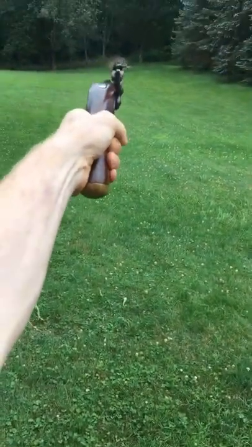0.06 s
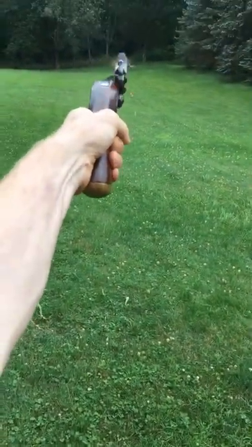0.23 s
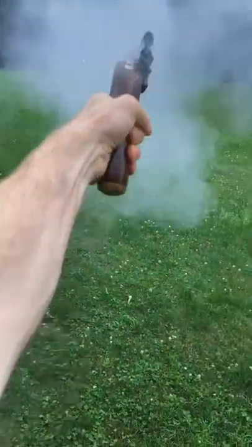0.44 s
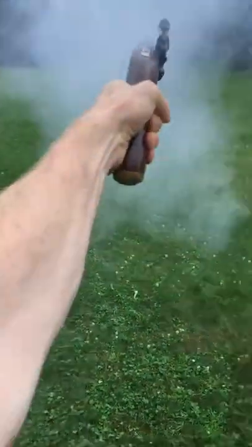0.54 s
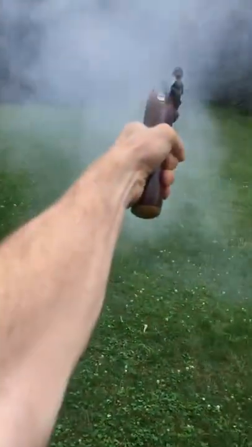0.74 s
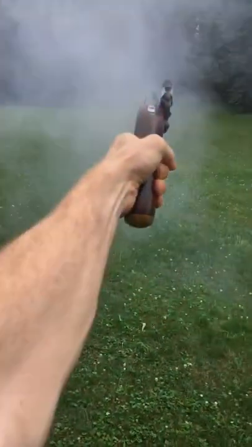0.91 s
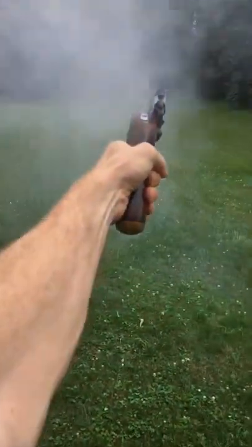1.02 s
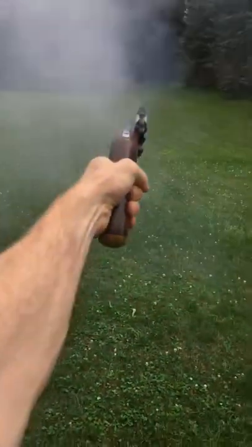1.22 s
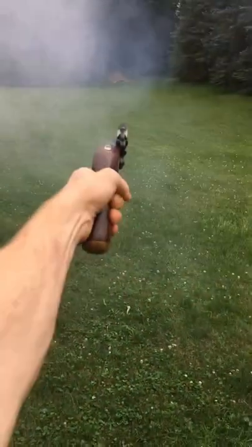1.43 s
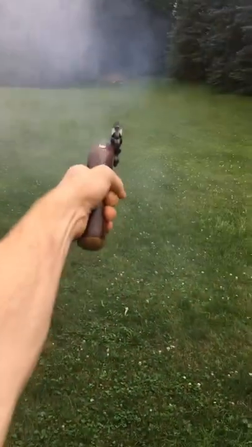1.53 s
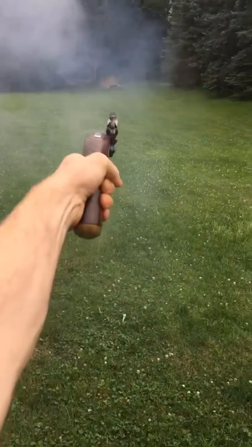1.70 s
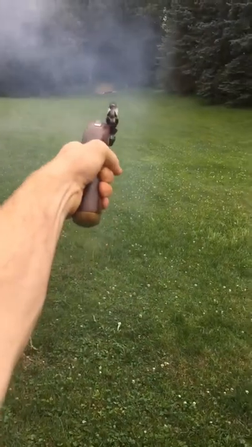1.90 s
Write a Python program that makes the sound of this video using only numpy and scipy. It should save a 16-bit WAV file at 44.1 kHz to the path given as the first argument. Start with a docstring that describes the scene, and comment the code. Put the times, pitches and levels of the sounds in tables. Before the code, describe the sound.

A single flintlock pistol shot, close up in a grassy field. The lock clacks and the priming hisses just before the loud, booming crack. The report echoes off the tree line, leaving a distant rumble, light wind and tiny handling ticks.

```python
"""A flintlock pistol fires at arm's length over a grass field edged with trees.
The sear clicks, flint strikes frizzen and the steel rings; the priming flares, and a tenth of a second
later the charge cracks and roars, its gas thumping the microphone. The tree line throws the report
back over light wind and faint insects. The recorder's gain ducks at the shot; a far roll lingers under
small handling ticks, growing louder as the gain comes back up."""
import sys
import numpy as np
from scipy import signal
from scipy.fft import rfft, irfft
from scipy.io import wavfile
from scipy.ndimage import uniform_filter1d

SR = 44100
rng = np.random.default_rng(int(sys.argv[2]) if len(sys.argv) > 2 else 0)


def to_wav(s):
    """Save 16-bit WAV."""
    ch = np.atleast_2d(s).T  # columns
    pcm = np.round(np.clip(ch, -1, 1) * 32767)  # PCM
    wavfile.write(sys.argv[1], SR, pcm.astype(np.int16))


N = 85995
TIME_S = np.arange(N) / SR
BINS_HZ = np.maximum(np.arange(N // 2 + 1) * SR / N, 1)


def amp(db):
    """Decibels to gain."""
    return np.exp(np.asarray(db) * (np.log(10) / 20))


def unit(x):
    """Scale to rms 1."""
    return x / np.sqrt(np.mean(x ** 2))


def shape(points):
    """Spectrum in dB per bin, interpolated over log frequency."""
    hz, db = np.array(points).T
    return np.interp(np.log(BINS_HZ), np.log(hz), db)


def bell(hz, octaves):
    """Spectral bell of height 1."""
    return np.exp(-.5 * (np.log2(BINS_HZ / hz) / octaves) ** 2)


def noise(spectrum_db):
    """Coloured noise of rms 1."""
    return unit(irfft(amp(spectrum_db) * np.exp(2j * np.pi * rng.random(N // 2 + 1)), N))


def grain(depth_db, samples):
    """Fast random flutter of level."""
    return unit(amp(depth_db * unit(uniform_filter1d(rng.standard_normal(N), samples))))


def envelope(start_s, rise_s, hold_s, t60_s, db):
    """Linear rise, hold, exponential fall."""
    out = np.zeros(N)
    live = slice(*np.searchsorted(TIME_S, [start_s, start_s + rise_s + hold_s + 2 * t60_s]))
    t = TIME_S[live] - start_s
    fall = np.exp(-np.log(1000) * np.maximum(t - rise_s - hold_s, 0) / t60_s)
    out[live] = amp(db) * np.minimum(t / rise_s, 1) * fall
    return out


def curve(points):
    """Gain along a level curve."""
    return amp(np.interp(TIME_S, *np.array(points).T))


def thumps(rows):
    """Low pressure swings that swell and die within a few cycles."""
    out = np.zeros(N)
    for start_s, hz, db, swell_s in rows:
        live = slice(*np.searchsorted(TIME_S, [start_s, start_s + 10 * swell_s]))
        t = TIME_S[live] - start_s
        swell = (t / swell_s * np.exp(1 - t / swell_s)) ** 2
        out[live] += amp(db) * swell * np.sin(2 * np.pi * hz * t)
    return out


def knocks(rows, focus_db):
    """Short noise bursts, each peaking at one frequency."""
    return sum(noise(focus_db * bell(hz, octaves=.67)) * envelope(start_s, .001, 0, t60_s, db)
               for start_s, db, t60_s, hz in rows)


# Background spectra. Each row: frequency in Hz, relative level in dB.
WIND_SPECTRUM = [(15, -10), (42, -0.5), (65, -7), (92, 0.5), (120, -14), (200, -31.5), (400, -50),
                 (2000, -80)]
AIR_SPECTRUM = [(100, 10), (300, 7.5), (1000, 2.5), (2500, 0), (6000, 0), (10000, -5), (15500, -8)]
HISS_SPECTRUM = [(500, -12.5), (2000, -3), (4000, -3), (6400, 0), (8000, -10), (11000, -18), (15500, -23)]
# Background level curves. Each row: time in seconds, gain in dB.
WIND_CURVE = [(0, -49.5), (.2, -42.5), (.55, -53.5), (1.05, -61), (1.26, -47.5), (1.45, -50), (1.7, -48),
              (1.95, -51)]
AIR_CURVE = [(0, -65.5), (.24, -60), (.4, -82), (1.1, -80), (1.4, -77), (1.8, -69), (1.95, -67.5)]
HISS_CURVE = [(1.36, -88), (1.53, -83), (1.57, -63.5), (1.68, -66), (1.8, -63), (1.95, -66)]
INSECT_CURVE = [(0, -3), (.08, 0), (.22, -0.5), (.45, -40)]
# Insects in the grass. Each row: centre in Hz, half-width in Hz, level in dB.
INSECT_BANDS = [(7500, 240, -68.5), (8410, 200, -71.5)]


def meadow():
    """Wind, air, insects, late hiss; the curves draw the gain ducking at the shot, then recovering."""
    insects = sum(amp(db) * noise(-20 * np.log10(1 + ((BINS_HZ - hz) / width_hz) ** 2))
                  for hz, width_hz, db in INSECT_BANDS)
    wind = noise(shape(WIND_SPECTRUM)) * curve(WIND_CURVE)
    air = noise(shape(AIR_SPECTRUM)) * curve(AIR_CURVE)
    hiss = noise(shape(HISS_SPECTRUM)) * curve(HISS_CURVE)
    return wind + air + hiss + insects * curve(INSECT_CURVE)


# Handling ticks. Each row: start in seconds, level in dB, t60 in seconds, peak in Hz.
HANDLING_TICKS = [(1.546, -59, .04, 5000), (1.556, -59.5, .03, 6980), (1.589, -45.5, .035, 3000),
                  (1.598, -48, .04, 3280), (1.894, -55.5, .05, 3490)]


def handling():
    """Handling makes small ticks after the shot."""
    return knocks(HANDLING_TICKS, focus_db=35)


# Far roll and tree echo spectra. Each row: frequency in Hz, relative level in dB.
ROLL_SPECTRUM = [(60, -3), (140, 6), (280, -6), (550, 0), (950, 0.5), (1500, -3.5), (2100, -10),
                 (4000, -15.5), (5500, -24.5), (7000, -29), (10000, -40), (15500, -50)]
ECHO_SPECTRUM = [(40, -11.5), (130, 3), (260, -5), (550, 2.5), (1000, 0.5), (2000, -4), (4000, -11),
                 (6500, -16), (9500, -26), (13000, -36), (15500, -52)]
# Far roll, lifted late by the recovering gain. Each row: time in seconds, level in dB.
ROLL_CURVE = [(.5, -67), (.8, -47), (1.0, -49), (1.15, -51), (1.33, -55), (1.43, -50.5), (1.6, -49),
              (1.77, -47.5), (1.95, -52)]
# Tree echoes. Each row: start, rise, hold and t60 in seconds, level in dB, tilt in dB per octave,
# bass and midrange gain in dB.
TREE_ECHOES = [(0.559, .02, 0.016, 0.26, -35.5, 1, -4.5, 7.5), (0.613, 0.029, 0.017, 0.12, -31, 1, 7, -0.5),
               (0.638, 0.052, 0.023, .5, -36.5, 0.2, -1.5, 0), (.71, 0.033, 0.054, 0.59, -38, -1, 0.5, -1),
               (0.802, 0.031, 0.043, 0.41, -40.5, -2, -7, 2)]
# Rebounds off far ground and woods. Each row: start in seconds, pitch in Hz, level in dB,
# swell in seconds.
DEEP_REBOUNDS = [(.650, 160, -30, .0045), (.738, 115, -39, .016), (1.055, 125, -44, 0.016),
                 (1.198, 104.3, -38.5, 0.012)]


def trees():
    """Trunks and foliage return the report in grainy clusters, duller with distance, over a far roll."""
    octave = np.log2(BINS_HZ / 1000)
    bass = 1 / (1 + (BINS_HZ / 454) ** 4)
    mid = bell(hz=960, octaves=.24)
    out = noise(shape(ROLL_SPECTRUM)) * grain(depth_db=.95, samples=700) * curve(ROLL_CURVE)
    for start_s, rise_s, hold_s, t60_s, db, tilt_db, bass_db, mid_db in TREE_ECHOES:
        cluster = noise(shape(ECHO_SPECTRUM) + tilt_db * octave + bass_db * bass + mid_db * mid)
        out += cluster * grain(depth_db=1.4, samples=130) * envelope(start_s, rise_s, hold_s, t60_s, db)
    return out + thumps(DEEP_REBOUNDS)


# Near reflections. Each row: start in seconds, level in dB, t60 in seconds, peak in Hz.
NEAR_SLAPS = [(.4132, -19, .02, 2180), (.4352, -26, .024, 3400)]


def slaps():
    """Things close by slap the report back."""
    return knocks(NEAR_SLAPS, focus_db=36)


# Sear, flint on frizzen, frizzen and cock on their stops. Each row: start in seconds, level in dB,
# t60 in seconds, emphasis centre in Hz, emphasis in dB.
STEEL_BLOWS = [(0.1874, -42, 0.019, 3180, 1.5), (0.1945, -50, .06, 7000, 6), (.2414, -10.5, .012, 2870, 5),
               (.2464, -7, .009, 5340, 4), (0.253, -4, .009, 2843, 32), (0.2559, -14, .022, 6140, 7),
               (0.2596, -15.5, .03, 2500, 8)]
# Lock and barrel modes. Each row: frequency in Hz, relative level in dB, t60 in seconds.
STEEL_MODES = [(1405, -12, 0.17), (1935, -12, .07), (2295, -5.5, .07), (2480, -4, .065), (2605, -2, .06),
               (2950, -0.5, 0.04), (4220, -6, .055), (5860, -10, 0.085), (6080, -3, .055), (6880, -9, .07),
               (7970, -13, .07), (8630, -11, .06), (12660, -17.5, .055), (13800, -18, .07)]
# Steel clash. Each row: frequency in Hz, relative level in dB.
CLASH_SPECTRUM = [(100, -27.5), (280, -12), (700, -30.5), (1100, -19), (1500, -5), (2800, 1.5), (6300, -3),
                  (9500, -8.5), (15500, -18.5)]


def lock():
    """Each steel blow is a short clash that leaves lock and barrel ringing."""
    rise_s, contact_s = .0004, .0011
    out, t = np.zeros(N), TIME_S[:SR // 5]
    mode_hz, mode_db, ring_s = np.array(STEEL_MODES).T[:, :, None]
    modes = np.exp((2j * np.pi * mode_hz - np.log(1000) / ring_s) * t)
    modes *= amp(mode_db - 5.5) / 2 * np.minimum(t / rise_s, 1)
    for start_s, db, t60_s, hz, emphasis_db in STEEL_BLOWS:
        clash = noise(shape(CLASH_SPECTRUM) + emphasis_db * bell(hz, octaves=.12))
        out += clash * envelope(start_s, rise_s, contact_s, t60_s, db)
        phases = np.exp(2j * np.pi * rng.random(mode_hz.shape))
        first = int(start_s * SR)
        out[first:first + len(t)] += amp(db) * (modes * phases).imag.sum(axis=0)
    return out


# Priming spectra. Each row: frequency in Hz, relative level in dB.
FIZZ_SPECTRUM = [(60, -2), (280, 4), (700, -10.5), (1400, 4), (2800, 1), (6500, -2), (10000, -6),
                 (15500, -10)]
FLARE_SPECTRUM = [(40, 2), (100, 7.5), (170, 3), (300, -3.5), (500, -5), (750, -13), (1300, -11),
                  (2500, -26), (15500, -45)]


def priming():
    """Powder in the pan fizzes brightly, then flares low."""
    fizz = noise(shape(FIZZ_SPECTRUM)) * grain(depth_db=2.1, samples=60)
    fizz *= envelope(start_s=.247, rise_s=.0079, hold_s=.0164, t60_s=.1956, db=-21.5)
    flare = noise(shape(FLARE_SPECTRUM))
    flare *= envelope(start_s=.281, rise_s=.0055, hold_s=-.0011, t60_s=.15, db=-21.5)
    return fizz + flare


# Report spectra. Each row: frequency in Hz, relative level in dB.
CRACK_SPECTRUM = [(100, -4), (350, 3), (700, -6), (1000, -4.5), (3000, 1), (6500, 0), (9500, -5),
                  (15500, -13)]
ROAR_SPECTRUM = [(30, 6), (100, 12), (250, 6.5), (500, 0.5), (1100, 0), (2500, -5.5), (6500, -6),
                 (9500, -8.5), (15500, -17.5)]
SCATTER_SPECTRUM = [(40, 8), (120, 7.5), (300, 1), (1000, 0), (2500, -6.5), (6500, -8.5), (10000, -16),
                    (15500, -30)]
# Gas pushes from pan and muzzle. Each row: start in seconds, pitch in Hz, level in dB, swell in seconds.
GAS_PUSHES = [(.257, 48, -26, .012), (.2865, 208, -25.5, 0.0069), (.302, 33, -15, 0.016),
              (.3502, 287.4, -9, .004), (.353, 129.6, -15, .005), (.384, 38.1, -6, .010),
              (.4115, 167.9, -23.5, 0.0044), (.42, 33.2, -24.5, 0.016)]


def discharge():
    """The muzzle cracks and roars, the field scatters the roar, and powder gas pushes the microphone."""
    roar_s = .3492
    crack = noise(shape(CRACK_SPECTRUM)) * grain(depth_db=2, samples=20)
    crack *= envelope(start_s=.3474, rise_s=.003, hold_s=.0035, t60_s=.0086, db=-9)
    roar = noise(shape(ROAR_SPECTRUM)) * grain(depth_db=1.84, samples=50)
    roar *= envelope(start_s=roar_s, rise_s=.002, hold_s=.0305, t60_s=.1321, db=-14)
    scatter = noise(shape(SCATTER_SPECTRUM)) * grain(depth_db=1.5, samples=120)
    scatter *= envelope(start_s=roar_s, rise_s=.0472, hold_s=.03, t60_s=.46, db=-33.5)
    return crack + roar + scatter + thumps(GAS_PUSHES)


def scene():
    """The shot and its surroundings, mono."""
    shot = lock() + priming() + discharge()
    return (shot + slaps() + trees() + handling() + meadow())[None]


# Microphone response. Each row: frequency in Hz, gain in dB.
MIC_RESPONSE = [(3000, 0), (3400, -2.5), (4200, 2.5), (4850, -8), (5900, 1), (6900, 0), (7600, -2),
                (9800, 1.5), (10400, -5.5), (11500, 0), (15500, -0.5)]


def record(dry):
    """The microphone colours the sound, peaks clip, and the top is cut."""
    top_hz = 15800
    cepstrum = irfft(np.log(amp(shape(MIC_RESPONSE))), N)
    cepstrum[1:] *= 2 * (np.arange(1, N) < N // 2)  # minimum phase
    coloured = irfft(rfft(dry) * np.exp(rfft(cepstrum)), N)
    lowpass = signal.ellip(10, .2, 80, top_hz, fs=SR, output="sos")
    return signal.sosfilt(lowpass, np.clip(coloured, -1, 1))


dry = scene()
out = record(dry)
to_wav(out)
```